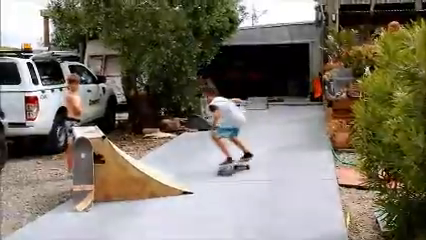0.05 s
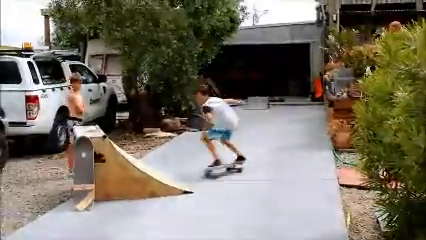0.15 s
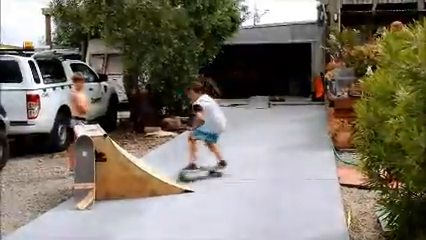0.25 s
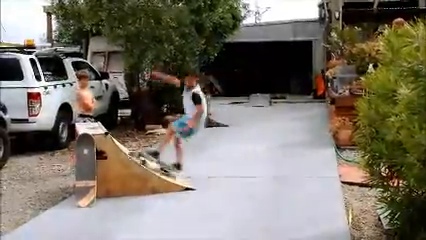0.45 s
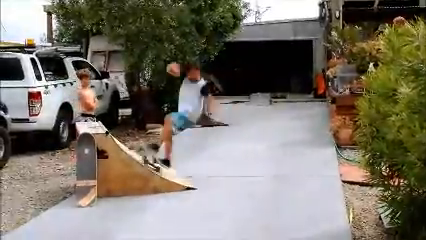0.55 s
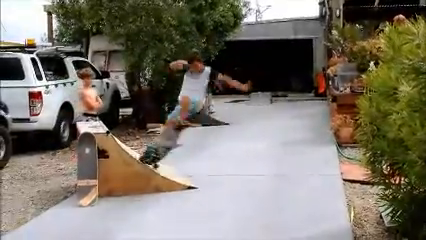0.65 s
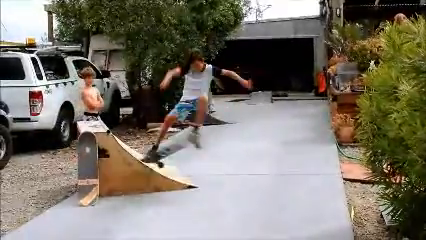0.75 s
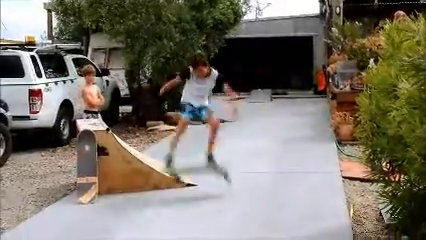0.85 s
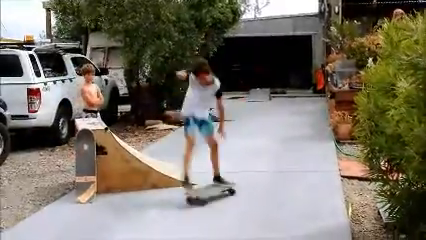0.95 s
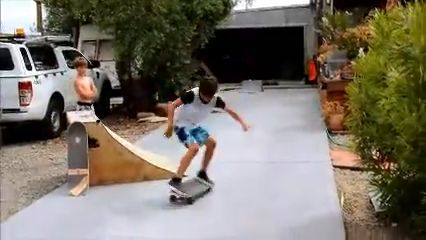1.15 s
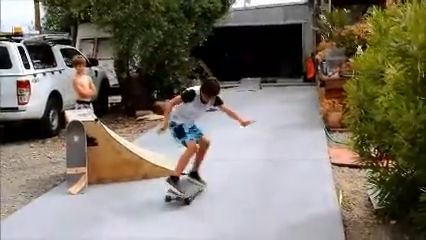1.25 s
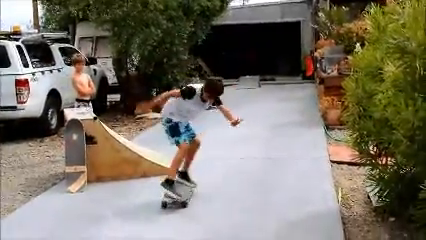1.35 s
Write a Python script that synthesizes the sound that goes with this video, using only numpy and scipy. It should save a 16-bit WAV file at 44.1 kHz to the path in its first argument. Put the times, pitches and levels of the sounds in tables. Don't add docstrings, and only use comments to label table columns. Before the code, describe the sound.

A skateboard rolls with a gritty low rumble over concrete, thumps hollowly onto a plywood ramp, taps it, then slams back onto the slab with a sharp clack; open yard, short echoes, fairly close microphone.

```python
import sys
import numpy as np
from scipy import signal
from scipy.fft import rfft, irfft
from scipy.io import wavfile
from scipy.ndimage import uniform_filter1d

SR = 44100
rng = np.random.default_rng(int(sys.argv[2]) if len(sys.argv) > 2 else 0)


def log_audio(samples):
    frames = np.atleast_2d(samples).T
    limited = np.clip(frames, -1, 1)
    pcm = np.round(limited * 32767).astype(np.int16)
    wavfile.write(sys.argv[1], SR, pcm)


def ratio(d):
    e = np.asarray(d, float) / 20
    return 10 ** e


N = 61739


def evened(x):
    return x / np.sqrt(np.mean(x ** 2) + 1e-20)


def read(points, hz):
    f, value = np.transpose(points)
    return np.interp(np.log(hz + 1), np.log(f + 1), value)


def add(mix, start_s, sound):
    part = mix[round(start_s * SR):][:len(sound)]
    part += sound[:len(part)]


def colour(x, points):
    gain = ratio(read(points, np.fft.rfftfreq(len(x), 1 / SR)))
    return evened(irfft(rfft(x) * gain, len(x)))


def resonate(x, hz, width_hz):
    turn = np.exp(2j * np.pi * hz * np.arange(len(x)) / SR)
    r = np.exp(-np.pi * abs(width_hz) / SR)
    return 2 * (turn * signal.lfilter([1 - r], [1, -r], x / turn)).real


def band(x, lo_hz, hi_hz):
    sos = signal.butter(3, [lo_hz, hi_hz], "bandpass", fs=SR, output="sos")
    return signal.sosfilt(sos, x)


def rolling():
    # t/s, rumble level/dB, hiss over rumble/dB, boom lift (and clatter cut)/dB
    course = [(0, -25, -22.5, -2.5), (.1, -29.5, -15, -1.5), (.2, -27.5, -13.5, -4.5),
              (.3, -28.5, -14.5, -3.5), (.4, -28, -10, 6), (.52, -26.5, -18.5, -2), (.56, -26.5, -10, 4),
              (.66, -24.5, -18, 4.5), (.74, -32, -8, 2.5), (.83, -33.5, -9, 9), (.95, -34.5, -7, 2),
              (1.029, -38, -7, 8.5), (1.084, -33.5, 5.5, -4), (1.15, -37, 3.5, -24), (1.2, -47, 8.5, -21.5),
              (1.26, -44.5, 4, -13), (1.31, -53, 6, -8), (1.4, -53.5, 3, -14.5)]
    # f/Hz, density/dB per Hz
    rumble_spectrum = [(12, -52), (20, 0), (229, -1), (265, -10.5), (427, -3), (552, -27), (741, -5),
                       (1130, -21), (1600, -22), (2080, -35), (3520, -120)]
    # f/Hz, density/dB per Hz
    hiss_spectrum = [(530, -5), (900, -1.5), (1130, -8.5), (1190, -4), (1690, -3), (2590, -8),
                     (4110, -11.5), (5910, -17.5), (11600, -29.5), (15100, -62), (22000, -120)]
    # f/Hz, width/Hz, level/dB
    deck_modes = [(170, 76, -1), (257, 71, 0.5), (350.6, 68.6, 0.5), (433, 99, -9), (604, 100, -8),
                  (800, 150, -24)]
    grit_per_s, grit_spread_db, deck_share = 1500, 2.5, 0.6
    boom_hz, clatter_hz, clatter_loss = 128, 330, 0.67
    wheel_hz, wheel_s, wheel_db = 13.6, 0.213, 2
    whine_hz, whine_width_hz, whine_db, whine_s, whine_long_s = 4500, 560, -47.5, 0.29, 0.076
    air_db = -82

    t = np.arange(N) / SR
    course_s, *levels = np.transpose(course)
    rumble_db, hiss_db, boom_lift_db = (np.interp(t, course_s, level) for level in levels)
    chance, size = rng.random(N), rng.exponential(1, N)
    rough, hiss_noise, air = rng.standard_normal((3, N))

    jolt = np.sign(rough) * ratio(grit_spread_db * np.minimum(size, 5))
    grit = evened(jolt * (chance < grit_per_s / SR))
    deck = evened(sum(ratio(db) * evened(resonate(resonate(grit, hz, width), hz, 3 * width))
                      for hz, width, db in deck_modes))
    ground = colour(grit + 0.89 * rough, rumble_spectrum)
    rumble = evened(deck_share * deck + (1 - deck_share) * ground)

    pump_db = wheel_db * np.cos(2 * np.pi * (t - wheel_s) * wheel_hz)
    boom = ratio(boom_lift_db) * band(rumble, 32, boom_hz)
    body = ratio(0.17 * boom_lift_db) * band(rumble, boom_hz, clatter_hz)
    clatter = ratio(-clatter_loss * boom_lift_db + pump_db) * band(rumble, clatter_hz, 4500)
    rumble = boom + body - clatter

    flutter = ratio(0.91 * evened(uniform_filter1d(abs(grit), 300) - np.mean(abs(grit))))
    hiss = colour(hiss_noise * flutter, hiss_spectrum)
    whine = evened(band(air, whine_hz - whine_width_hz, whine_hz + whine_width_hz))
    whine = ratio(whine_db) * whine * np.exp(-((t - whine_s) / whine_long_s) ** 2)
    return ratio(rumble_db) * (rumble + ratio(hiss_db) * hiss) + whine + ratio(air_db) * air


def crack(s, db, hz, t60_s, noise):
    # f/Hz, density/dB per Hz
    broad_spectrum = [(180, -27), (300, -6.5), (823, -1), (1000, -2.5), (2160, 0.5), (2840, -12),
                      (3800, -7.5), (5400, -13), (11600, -21.5), (15100, -45), (22000, -120)]
    # f/Hz, width/Hz, level/dB
    truck_modes = [(2193, 88, 5.5), (3002, 59, 4), (3500, 27, 0.5), (3624, 30, -1), (3860, 35, -6),
                   (4460, 41, -1), (4980, 45, -3), (6440, 39, -4), (1614, 63, 1.5)]
    rise_s, softer, snap = 0.00072, 0.11, 8.9
    broad_db, broad_top, sheen_db, ring_db, trim_db = -2, 1.91, -3.5, -5, -1.6

    t = np.arange(len(noise)) / SR
    rise = 1 - np.exp(-t / (rise_s * ratio(-softer * db)))
    shape = rise * ratio(-60 * t / max(t60_s, 0.008))
    blow = noise * shape - snap * ratio(softer * db) * (np.arange(len(t)) == 20)
    struck = band(blow, hz / 1.56, hz * 1.31)

    burst = colour(noise, broad_spectrum) * shape
    sheen = ratio(sheen_db + 6 * np.log2(hz / 2800)) * band(burst, 5600, 22000)
    broad = band(burst, 260, min(broad_top * hz, 16000)) + sheen

    ring = 0
    for f, width, mode_db in truck_modes:
        width = width + 25
        near = ratio(mode_db - 6.0 * abs(np.log2(f / hz)))
        ring = ring + near * resonate(resonate(blow, f, width), f, 1200) / np.sqrt(width)

    both = struck / abs(struck).max()
    both = both + ratio(broad_db) * broad / abs(broad).max()
    both = both + ratio(ring_db) * ring / abs(ring).max()
    return s - 0.0005, ratio(db + trim_db) * both


def cracks(out):
    # t/s, peak level/dB, centre f/Hz, t60/s
    strikes = [(0.127, -50, 1060, 0.029), (.357, -29, 1780, 0.02), (.411, -38, 2270, 0.025),
               (0.4431, -14.5, 1520, 0.17), (0.4539, -9, 2140, 0.061), (.4650, -12, 2270, 0.053),
               (.471, -21, 4500, 0.072), (0.5741, -14, 5500, 0.0086), (0.5842, -12.5, 2180, 0.044),
               (0.5955, -24.5, 4250, 0.11), (0.775, -26, 1630, 0.068), (0.7805, -25, 4800, 0.024),
               (.817, -27, 2110, 0.021), (0.821, -30.5, 4500, 0.079), (0.85, -7, 2370, 0.011),
               (.856, -28.5, 3870, 0.093), (0.9023, -27, 3500, 0.019), (1.0913, 1.5, 3870, 0.023),
               (1.0962, -7, 4800, 0.043), (1.1010, 0.5, 2780, 0.028), (1.1082, -3.5, 3500, 0.025),
               (1.1027, -10, 6650, 0.11), (1.1236, -12.5, 2610, 0.059), (1.1269, -6.5, 2500, 0.011),
               (1.1311, -11, 4400, 0.026), (1.1606, -22, 2450, 0.014), (1.166, -19, 3500, 0.021),
               (1.1734, -22, 2420, 0.011), (1.211, -26, 2200, 0.023), (1.2184, -27.5, 2500, 0.02),
               (1.2238, -33, 2120, 0.029), (1.0886, -7.5, 3100, .03), (1.1065, -14, 2400, 0.026),
               (1.1131, -19, 3500, 0.025), (1.1015, -11.5, 10400, 0.013), (1.0912, -9, 9800, 0.02),
               (.5745, -18, 9000, 0.014), (0.8924, -27.5, 1780, 0.015)]
    for row, noise in zip(strikes, rng.standard_normal((len(strikes), 6000))):
        add(out, *crack(*row, noise))


def thud(s, db, hz, t60_s, noise):
    overtone, overtone_db, rattle_share = 1.69, -15, 0.21
    t = np.arange(len(noise)) / SR
    decay_db = -60 * t / max(t60_s, 0.02)
    tone = -np.sin(2 * np.pi * hz * t)
    tone = tone + ratio(overtone_db + decay_db) * np.sin(2 * np.pi * overtone * hz * t)
    rattle = evened(band(noise, 0.58 * hz, 3 * hz)) * np.minimum(t / 0.0027, 1)
    rise = np.sin(np.pi / 2 * np.minimum(t * hz * 1.2, 1)) ** 2
    return s - 0.5 / hz, ratio(db + decay_db) * rise * (tone + rattle_share * rattle)


def thuds(out):
    # t/s, peak level/dB, pitch/Hz, t60/s
    blows = [(.4463, -8, 211, 0.045), (0.4519, 0, 231, 0.068), (0.4595, -6, 303, 0.049),
             (0.4629, -2.5, 223, .04), (.47, -1.5, 259, 0.046), (.474, 1, 245, 0.026),
             (0.4859, -7.5, 199, 0.063), (.464, -15.5, 886, 0.066), (0.5784, -6.5, 166, 0.097),
             (.589, -12.5, 849, 0.051), (.5972, -3, 338, .03), (.6, -4, 360, 0.046),
             (0.6064, -18, 197, 0.044), (.611, -3.5, 149, .045), (.628, -14, 235.5, .1),
             (.772, -20, 215, 0.057), (.8508, -13, 695, 0.028), (0.855, -7, 232.5, 0.072),
             (.8512, -12, 1126, 0.025), (0.95, -25, 122, 0.05), (1.022, -26.5, 646, 0.044),
             (1.097, -18, 507, 0.018), (1.1063, -11.5, 760, 0.045), (1.1168, -12.5, 624, 0.032),
             (1.123, -6.5, 408, 0.02), (1.1272, 4.5, 330, .02), (1.1312, -9.5, 251, 0.037),
             (1.139, -22, 249, 0.022), (1.17, -25.5, 1455, 0.043), (1.185, -27.5, 800, 0.035),
             (1.218, -25, 642, 0.062), (0.126, -16, 490, 0.016), (.132, -16.5, 439, 0.038),
             (.142, -25, 700, .04), (0.182, -16, 303, 0.045), (.188, -21.5, 654, 0.026),
             (.2012, -11.5, 567, 0.023), (.205, -14.5, 300, 0.033), (0.2164, -15.5, 444, 0.034),
             (.229, -19.5, 430, .04), (.247, -26, 496, 0.025), (.2735, -17.5, 670, 0.024),
             (.277, -21, 420, 0.038), (.298, -11.5, 288, 0.054), (.362, -15.5, 222, 0.055),
             (.392, -23, 170, 0.054)]
    for row, noise in zip(blows, rng.standard_normal((len(blows), 9000))):
        add(out, *thud(*row, noise))


def ramp_tap(out):
    # f/Hz, level/dB, t60/s
    ramp_modes = [(194, -8, .3), (301, 0, .25), (262, -11, .2), (441, -14, .13), (603, -13, .15),
                  (834, -18, .15)]
    tap_s, tap_db, rise_s = 0.8636, -16.5, 0.0026
    t = np.arange(SR // 2) / SR
    ring = sum(ratio(tap_db + db - 60 * t / t60_s) * np.sin(2 * np.pi * hz * t)
               for hz, db, t60_s in ramp_modes)
    add(out, tap_s, np.minimum(t / rise_s, 1) * ring)


def scrapes(out):
    # middle t/s, level/dB, length/s, low f/Hz, high f/Hz
    drags = [
        (0.777, -46.5, 0.024, 4400, 8800),
        (0.817, -51, .03, 4300, 6850),
        (1.075, -43, .04, 2500, 8000),
    ]
    for s, db, length_s, lo_hz, hi_hz in drags:
        grain = rng.standard_normal(4000)[:int(length_s * SR)]
        rasp = evened(band(grain * abs(grain), lo_hz, hi_hz))
        add(out, s - length_s / 2, ratio(db) * np.hanning(len(grain)) * rasp)


def squeaks(out):
    # t/s, level/dB, length/s, f/Hz
    chirrups = [
        (.7795, -34.5, 0.0047, 5020),
        (.818, -37, 0.0062, 4500),
        (1.019, -37, 0.01, 1700),
        (1.04, -35.5, 0.011, 1750),
        (1.052, -35, 0.01, 1730),
        (1.066, -29, 0.0076, 1830),
        (1.076, -25, 0.0089, 1750),
    ]
    for s, db, length_s, hz in chirrups:
        t = np.arange(0, length_s, 1 / SR)
        swell = np.sqrt(2) * np.sin(np.pi * t / length_s)
        add(out, s, ratio(db) * swell * np.sin(2 * np.pi * hz * t))


def knocks():
    out = np.zeros(N)
    for source in (cracks, thuds, ramp_tap, scrapes, squeaks):
        source(out)
    return band(out, 83, 14600)


def yard(hits):
    # f/Hz, t60/s
    yard_decay = [(150, 0.37), (600, 0.24), (2000, 0.18), (6000, 0.23), (12000, 0.27)]
    yard_db, bass_db = -12.5, -5
    taps = np.zeros(SR // 2)
    at = np.arange(300, len(taps) - 20, 20)
    taps[at + rng.integers(0, 20, len(at))] = rng.choice([-1., 1.], len(at))
    hz, t, z = signal.stft(taps, SR, nperseg=256)
    decay = ratio(-60 * t / read(yard_decay, hz)[:, None])
    tail = signal.istft(z * decay, SR, nperseg=256)[1]

    bass = signal.sosfiltfilt(signal.butter(2, 600, fs=SR, output="sos"), hits)
    sent = hits + (ratio(bass_db) - 1) * bass
    return ratio(yard_db) * signal.fftconvolve(sent, tail / np.linalg.norm(tail))[:N]


def scene():
    hits = knocks()
    return (rolling() + hits + yard(hits))[None]


def band_limit(x):
    return signal.sosfilt(signal.butter(12, 16000, fs=SR, output="sos"), x)


def record(dry):
    ceiling, edge_hz, edge_db = 1.84, 11600, -12
    x = ceiling * np.tanh(dry / ceiling)
    edge = signal.firwin(511, edge_hz, window=("kaiser", 9), fs=SR)
    low = signal.oaconvolve(x, edge[None], "same")
    loud = np.clip(uniform_filter1d(abs(band(x, 2500, 9000)), 200) * 5, 0, 1) ** 4
    mix = low + ratio(edge_db) * loud * (x - low)
    return band_limit(np.clip(mix, -1, 1))


dry = scene()
out = record(dry)
log_audio(out)
```